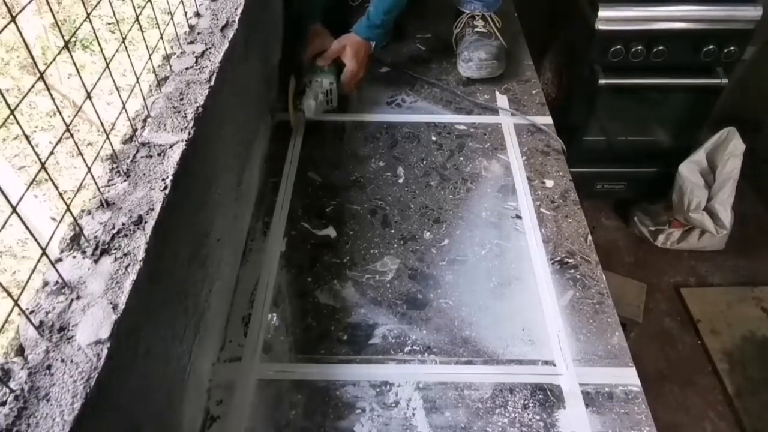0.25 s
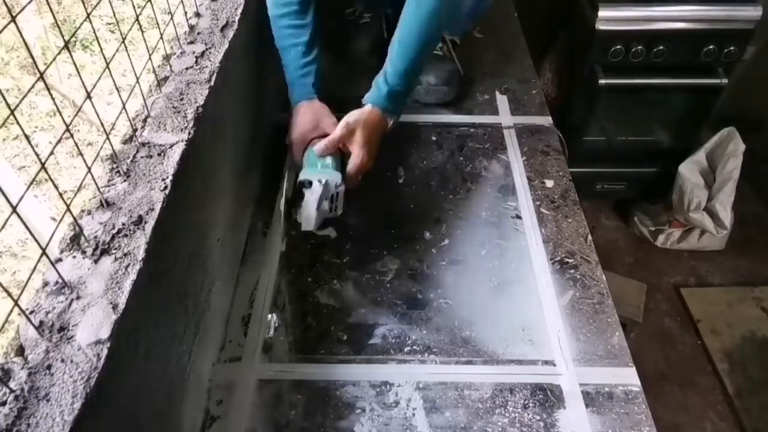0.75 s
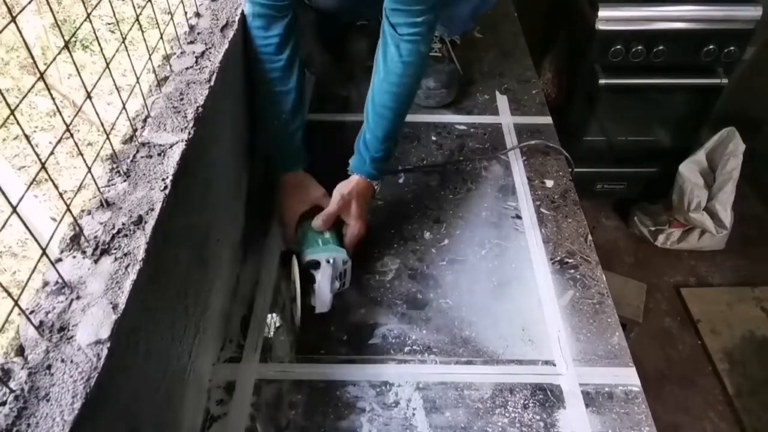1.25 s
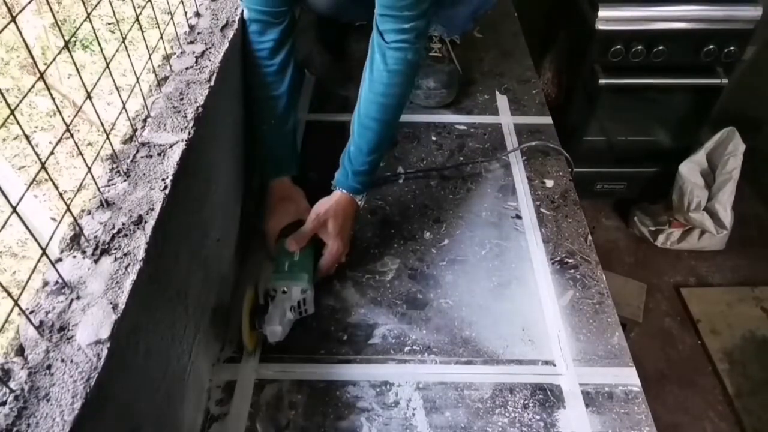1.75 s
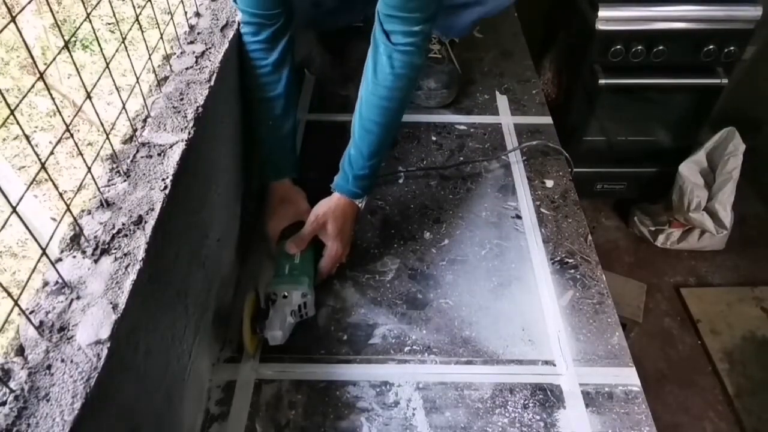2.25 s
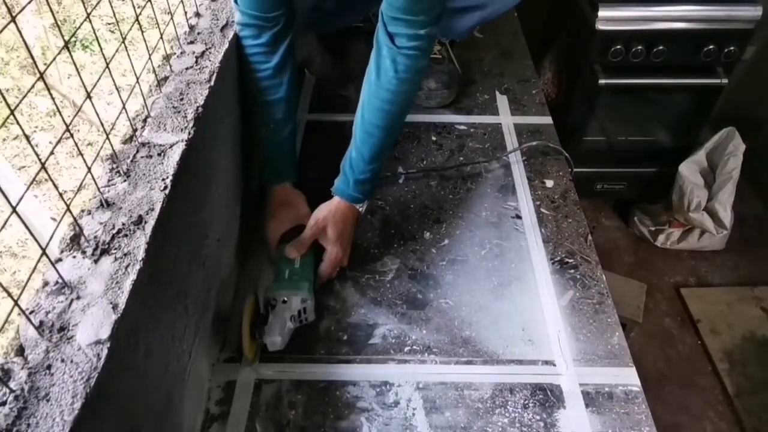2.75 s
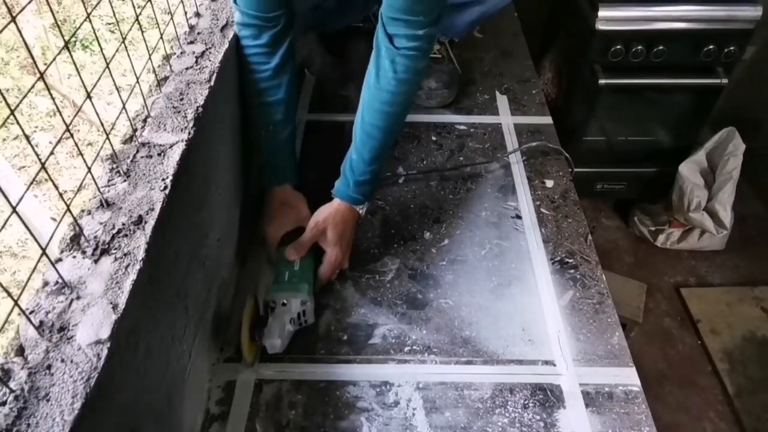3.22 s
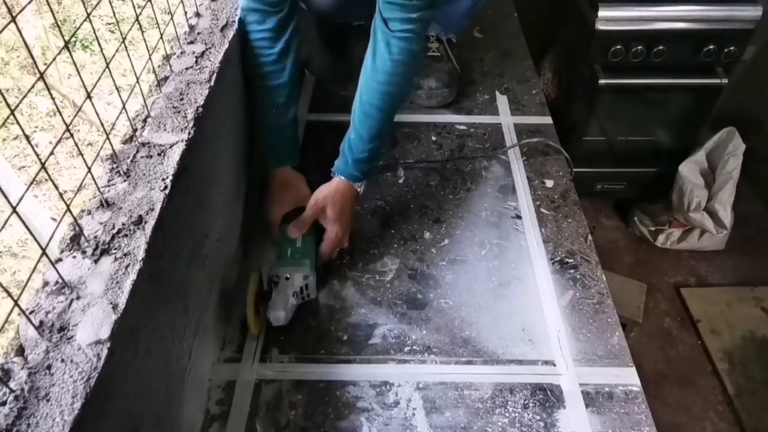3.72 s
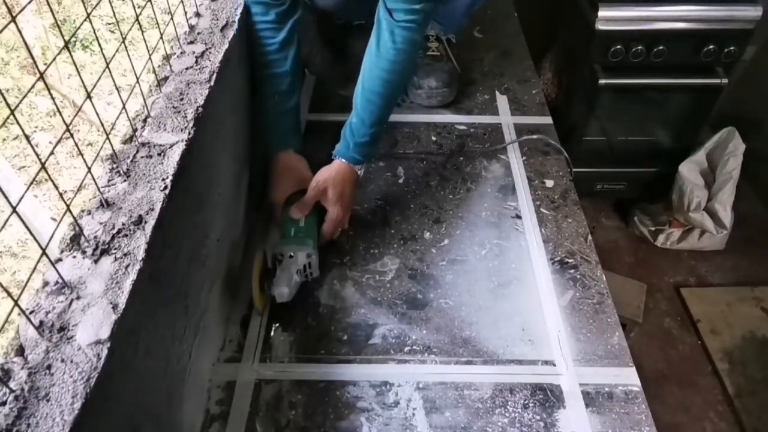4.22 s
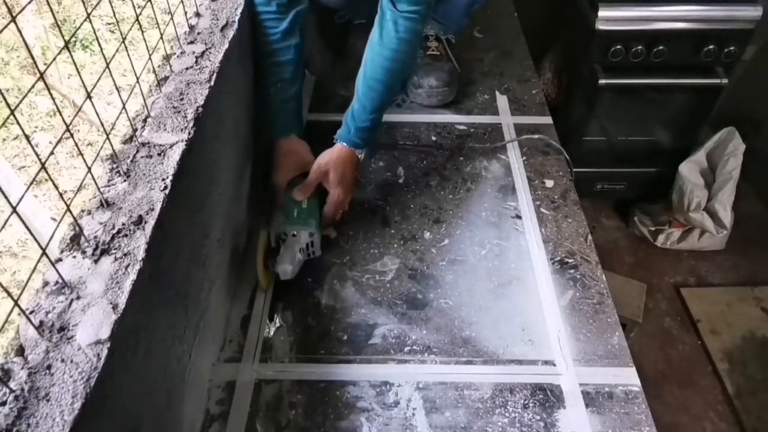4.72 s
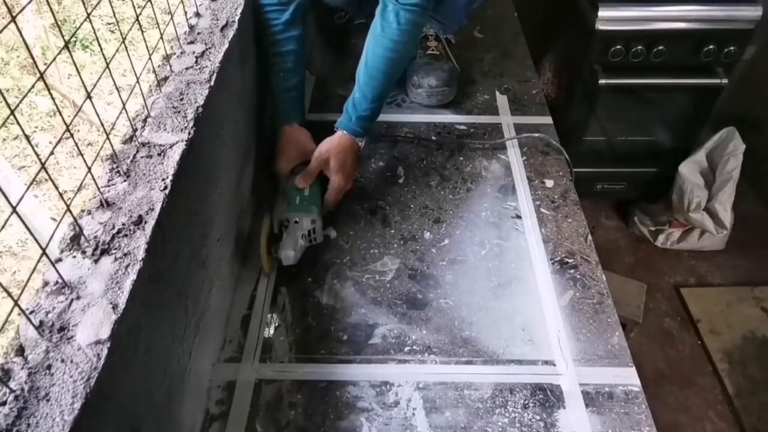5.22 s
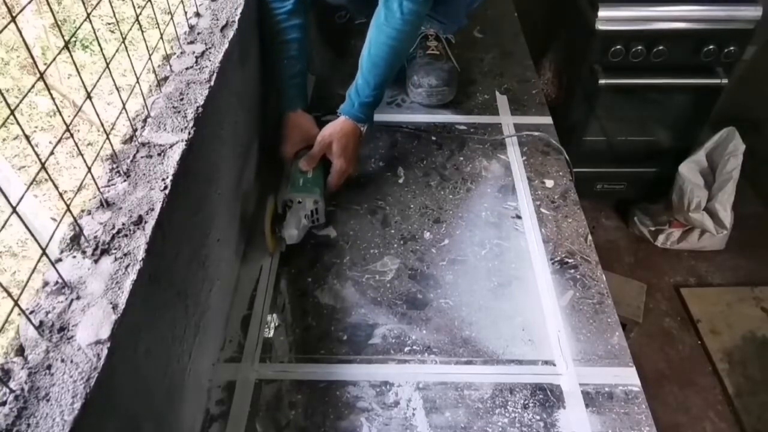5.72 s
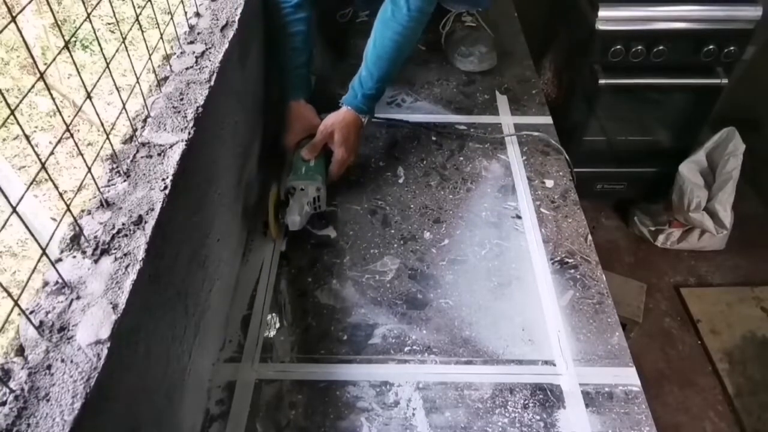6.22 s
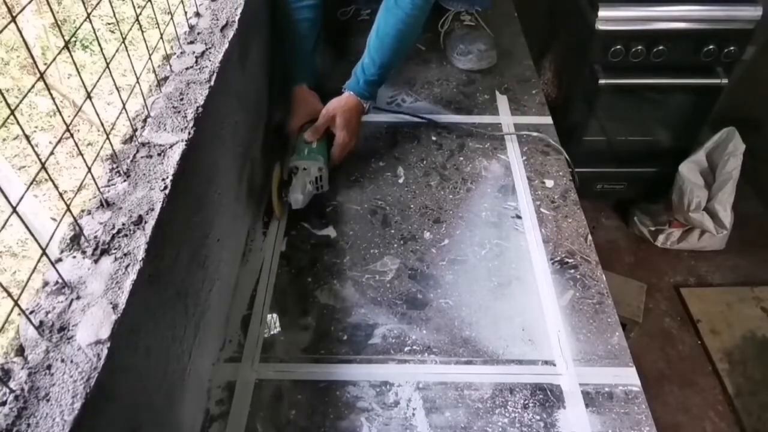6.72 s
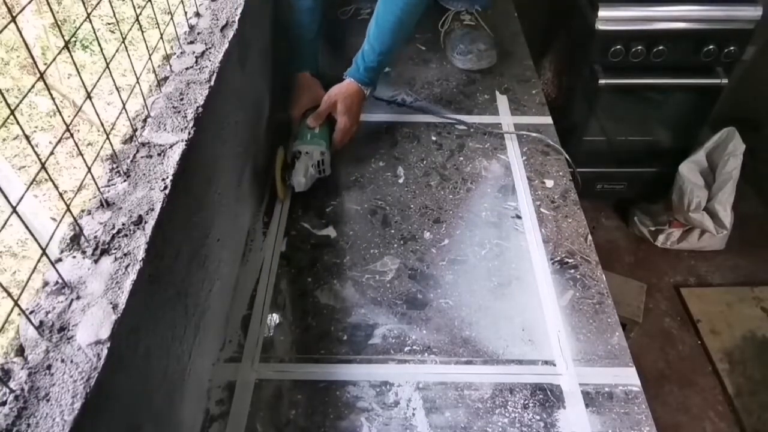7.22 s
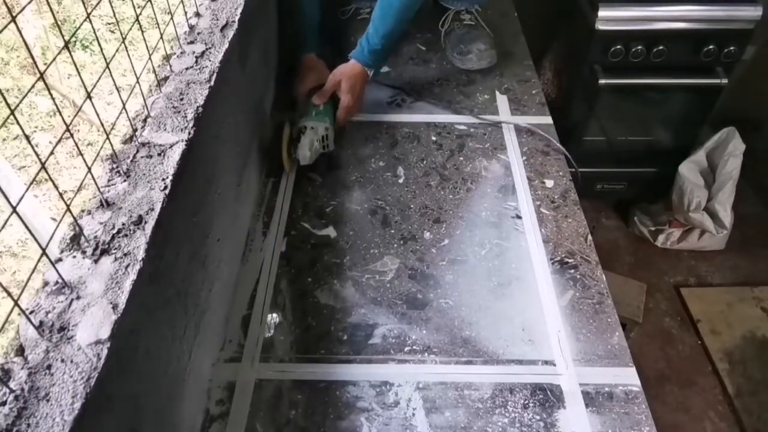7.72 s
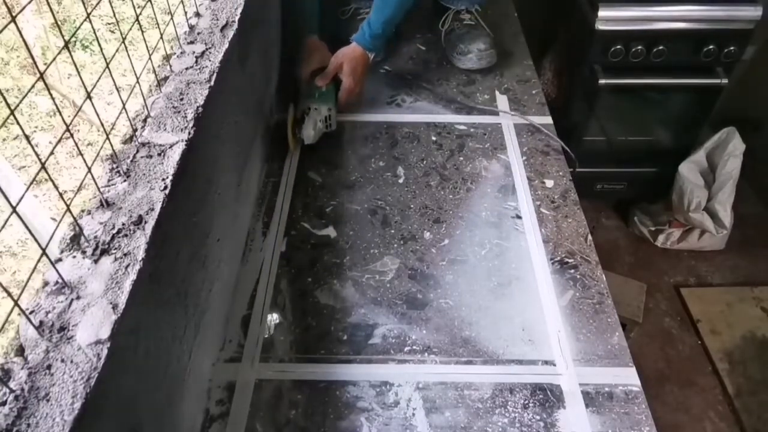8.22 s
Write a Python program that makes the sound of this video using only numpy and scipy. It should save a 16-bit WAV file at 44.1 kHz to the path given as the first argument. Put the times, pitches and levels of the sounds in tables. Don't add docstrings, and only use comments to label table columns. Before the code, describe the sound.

Bright ringing scrape of a grinding disc in tile, a short airy free-running whir, then long gritty cutting close by with flying chips ticking.

```python
import sys
import numpy as np
from scipy import signal
from scipy.fft import rfft, irfft, next_fast_len
from scipy.io import wavfile

SR = 44100
rng = np.random.default_rng(int(sys.argv[2]) if len(sys.argv) > 2 else 0)


def amplitude_ratio(level_db):
    exponent = np.asarray(level_db, float) / 20
    return 10 ** exponent


def unload_audio(sound):
    columns = np.transpose(np.atleast_2d(sound))
    steps = np.round(np.clip(columns, -1, 1) * 32767)
    wavfile.write(sys.argv[1], SR, steps.astype(np.int16))


N = 373086
TIME = np.arange(N) / SR
HZ = np.maximum(np.fft.rfftfreq(next_fast_len(N), 1 / SR), 1)
LIFT_S, DOWN_S = 0.316, 1.85
HALVES = np.array([[.5], [-.5]])


def rms_one(x):
    return x / np.sqrt(np.mean(x ** 2) + 1e-20)


def in_time(rows):
    s, *columns = np.transpose(rows)
    return [np.interp(TIME, s, c) for c in columns]


def during(start_s, end_s, fade_s):
    return np.clip(np.minimum(TIME - start_s + fade_s, end_s + fade_s - TIME) / fade_s, 0, 1)


def at_hz(points):
    hz, value = np.transpose(points)
    return np.interp(np.log(HZ), np.log(hz), value)


def colour(x, gain):
    size = next_fast_len(N)
    return irfft(rfft(x, size) * gain, size)[..., :N]


def drift(rate):
    hop = 40
    r = np.exp(-2 * np.pi * rate * hop / SR)
    noise = rng.standard_normal(N // hop + 2002)
    slow = signal.lfilter([1], [1, -2 * r, r * r], noise)[2000:]
    return np.interp(np.arange(N) / hop, np.arange(len(slow)), rms_one(slow))


def swells(rows):
    t = np.arange(0, N + 64, 64) / SR
    power = sum(amplitude_ratio(db) ** 2 * np.exp(-abs((t - s) / half_s) ** 2.3) for s, db, half_s in rows)
    return np.interp(TIME, t, np.sqrt(power))


def resonate(x, hz, width_hz):
    r = np.exp(-np.pi * width_hz / SR)
    return rms_one(signal.lfilter([1, 0, -1], [1, -2 * r * np.cos(2 * np.pi * hz / SR), r * r], x))


def patchy(x, spectrum, patchy_db, rate, count):
    place = np.clip(np.log(HZ / 400) / np.log(30), 0, 1) * (count - 1)
    gain = amplitude_ratio(at_hz(spectrum))
    total = 0
    for k in range(count):
        band = colour(x, gain * np.maximum(1 - abs(place - k), 0))
        total = total + band * amplitude_ratio(patchy_db * drift(rate))
    return rms_one(total)


def pair(alike):
    mid, side = rng.standard_normal((2, N))
    return colour(mid, np.sqrt(1 + alike)) + colour(side, np.sqrt(1 - alike)) * [[1], [-1]]


# t/s, reach (near 0 - far 1)
REACH = [
    (0, 1),
    (1.0, 0.48),
    (1.9, .0),
    (4.5, 0),
    (6.0, 0.78),
    (8.46, 1.0),
]


def reach():
    return np.clip(in_time(REACH)[0], 0, 1)


# t/s, pressure level/dB, bite depth level/dB
HAND = [(0, -2, -3), (.32, -5.5, -11.5), (1.85, -4, -8), (1.95, -1, -6), (2.3, -0.5, -4.5),
        (2.6, 0.5, -0.5), (3.19, 0, -2), (3.24, -5.5, -5), (3.42, 0.5, -3), (3.5, 1.5, -2), (4.1, .5, -1),
        (4.7, -1.5, 0), (6.0, 0.5, 0.5), (7.42, 0.5, -0.5), (7.52, -2, -7), (7.72, 1, -4),
        (8.31, -1.5, 0.5), (8.46, -3.5, -7)]


def hand():
    return in_time(HAND)


# t/s, peak level/dB, half length/s
SHOVES = [(2.05, -43, 0.056), (2.38, -45, .06), (2.56, -39.5, 0.067), (2.9, -40, 0.081), (3.47, -49, .06),
          (3.69, -38.5, .11), (3.87, -38, .07), (4.06, -39, 0.091), (4.21, -37.5, 0.082), (4.38, -39, 0.05),
          (4.51, -36.5, 0.052), (4.64, -38.5, 0.034), (4.8, -42, 0.043), (4.92, -39.5, 0.034),
          (5.04, -37.5, 0.058), (5.2, -38.5, 0.039), (5.37, -45, 0.17), (5.68, -42, 0.053),
          (5.84, -44.5, 0.057), (6.04, -50, 0.089), (6.26, -48, 0.066), (6.43, -42, 0.036),
          (6.58, -42, 0.031), (6.74, -44, 0.065), (7.1, -47.5, 0.21), (7.44, -44.5, 0.037),
          (7.72, -48, 0.05), (7.875, -48, 0.042), (8.08, -50, 0.064), (8.23, -47, .07)]


def shoves():
    return swells(SHOVES)


def disc_mode(force, near_hz, slide_hz, width_hz):
    pole = np.exp((2j * np.pi * near_hz - np.pi * width_hz) / SR)
    ringing = signal.lfilter([1], [1, -pole], force)
    return rms_one((ringing * np.exp(2j * np.pi * np.cumsum(slide_hz) / SR)).real)


DISC_MODES = [(3620, 3665, 63, -11.5, -1.5, -23, -9), (4707, 4725, 55, -8.5, 0.5, -31, -6),
              (6253, 6165, 210, -6, -7.5, -18, -8), (7740, 7655, 145, -2, -15, -3.5, 1.5),
              (7980, 8090, 87, -4, -1, -15, -12), (8680, 8695, 57, -2.5, -8, -0.5, -14),
              (8890, 9070, 150, -2, -30, 0, -18), (9963, 9930, 54, -0.5, 1, -7, -3.5),
              (10420, 10440, 130, -26, -1.5, -0.5, -10), (11720, 11610, 135, -0.5, -1, -4, -1),
              (12400, 12030, 85, -29, -9, -21, -5), (13250, 13710, 180, -9, -6, -6, -1.5),
              (14740, 14200, 300, 7, -6, -25, -21)]


def disc_ring(bite, far, depth_db):
    ring = 0
    force = bite * (rng.standard_normal((3, N)) + 1j * rng.standard_normal((3, N)))
    for near_hz, far_hz, width_hz, *db in DISC_MODES:
        near_db, far_db = np.reshape(db, (2, 2, 1))
        turn = np.exp(1j * rng.normal(0, 1.0) * HALVES)
        beam_db = near_db + (far_db - near_db) * far + 1.56 * np.array([drift(7.2), drift(5.3)])
        if near_hz < 7000:
            beam_db = beam_db - 0.86 * (depth_db + 3.0) * (1 - far)
        slide_hz = (far_hz - near_hz) * far + (10 + 25 * far) * drift(8)
        mode_force = 1.54 * force[0] * turn + force[1:]
        ring = ring + amplitude_ratio(beam_db) * disc_mode(mode_force, near_hz, slide_hz, width_hz)
    return rms_one(ring)


# f/Hz, level/dB per Hz
GRIT = [(450, -29), (800, -7), (2000, -3.5), (3300, 3.5), (5100, 1), (5600, 0.5), (6000, -1), (7000, 2.5),
        (9500, -1), (12200, -2), (16000, -3.5)]


def grit_hiss(bite):
    grit = patchy(bite * pair(0.028), GRIT, 1.5, 3.3, count=10)
    return amplitude_ratio(3.5 * shoves() / amplitude_ratio(-38)) * grit


# f/Hz, width f/Hz, level/dB
HOUSING = [
    (2330, 130, -5),
    (2668, 88, 1),
    (2896, 120, 2.5),
]
# t/s, peak level/dB over the housing
SNAGS = [(.136, -1), (1.86, -5), (3.48, -2), (3.91, 3.5), (5.01, 0), (5.17, -8), (6.08, -1), (6.39, 3),
         (6.97, 4.5), (7.13, 1), (7.46, -6), (7.69, 0), (7.89, -1), (8.07, -4), (8.21, -5), (8.4, 3)]


def housing_shake(bite, far):
    shake = 0
    for hz, width_hz, db in HOUSING:
        shake = shake + amplitude_ratio(db + 1.5 * drift(2.6)) * resonate(bite * pair(0.23), hz, width_hz)
    snag_s = 0.025
    chatter = amplitude_ratio(2.5 * drift(25)) + swells([(s, db, snag_s) for s, db in SNAGS])
    return amplitude_ratio(0.5 * far) * chatter * rms_one(shake)


def cut():
    far, (pressure_db, depth_db) = reach(), hand()
    bite = amplitude_ratio(0.57 * drift(23) + 0.63 * drift(71))
    ring = amplitude_ratio(-30.5 + pressure_db) * disc_ring(bite, far, depth_db)
    grit = amplitude_ratio(-33 + depth_db) * grit_hiss(bite)
    housing = amplitude_ratio(-43) * housing_shake(bite, far)
    touching = 1 - during(LIFT_S + .02, DOWN_S - .02, .02)
    return touching * (ring + grit + housing)


# f/Hz, level/dB per Hz
FAN = [(30, -29), (150, -25), (300, -25), (470, -32), (560, -12), (1000, -6.5), (1600, -10), (2650, -5),
       (4700, -2.5), (5600, -8), (7300, -11.5), (8000, -11.5), (12000, -14), (13000, -14), (14500, -12),
       (15500, -8)]
# f/Hz, left-right likeness of the fan rush
FAN_LIKENESS = [(60, 0.22), (130, 0.94), (290, 0.98), (640, 0.71), (1410, 0.53), (3100, -0.025),
                (6820, -0.15), (15000, 0.17)]
# f/Hz, width f/Hz, level/dB at lift-off, level/dB when set down again
FAN_DUCT = [(615, 300, -21.5, -20), (932, 86, -37, -9.5), (1143, 360, -15.5, -13.5),
            (1820, 350, -18, -24.5), (2600, 560, -6, -12.5), (6890, 110, -18, -19), (7310, 74, -28, -7.5),
            (7660, 100, -34, -30)]
# f/Hz, level/dB
LOADED_LOWS = [
    (700, -3.5),
    (1200, 0),
]


def motor():
    air = pair(np.clip(at_hz(FAN_LIKENESS), -1, 1)) * amplitude_ratio(1.07 * drift(64))
    turned = in_time([(.6, 0.085), (1.1, 0.47), (1.8, 0.86), (1.95, 0.3)])[0]
    free = during(LIFT_S + 0.043, DOWN_S - .01, 0.05)
    rush = patchy(air, FAN, 0.97, 20, count=6)
    for hz, width_hz, lift_db, down_db in FAN_DUCT:
        duct_db = lift_db + (down_db - lift_db) * turned + 2.0 * drift(1.64)
        duct_db = duct_db - (1 - free)
        rush = rush + amplitude_ratio(duct_db) * resonate(air, hz, width_hz)
    carry = np.sin(np.pi * np.clip((TIME - LIFT_S) / (DOWN_S - LIFT_S), 0, 1))
    free_db = -31 + 1.4 * carry - 0.06 * drift(9.5)
    load_db = -37.5 - 0.14 * hand()[1]
    loaded = amplitude_ratio(load_db) * colour(rush, amplitude_ratio(at_hz(LOADED_LOWS)))
    return (1 - free) * loaded + free * amplitude_ratio(free_db) * rush


# f/Hz, level/dB per Hz
PATTER = [(15, -7), (60, -5), (200, -1), (800, -4.5), (2000, -6.5), (5000, -12.5), (16000, -5)]


def small_chips():
    stray_db = -54 + 1.2 * hand()[1]
    stray = (1 - during(LIFT_S, DOWN_S, .02)) * amplitude_ratio(stray_db)
    dust = amplitude_ratio(-66)
    level = shoves() + stray + dust
    pan_db = 7 + (5 - 7) * reach() + 1 * drift(5)
    shower = amplitude_ratio(1.74 * drift(11.4) + 2.36 * np.array([drift(37.3), drift(22)]))
    hit = rng.random((2, N)) < 3500 / SR
    size = amplitude_ratio(3.64 * np.minimum(rng.exponential(1, (2, N)), 4.0))
    inward = np.where(rng.random((2, N)) < .68, 1, -1)
    patter = rms_one(colour(shower * hit * size * inward, amplitude_ratio(at_hz(PATTER)) * (HZ > 5)))
    return patter * level * amplitude_ratio(10 + pan_db * HALVES)


# t/s, peak level/dB, port (left 0, right 1)
BIG_CHIPS = [
    (2.337, -45, 0),
    (2.485, -30, 0),
    (3.86, -23, 1),
    (4.11, -18, 0),
    (4.201, -22, 0),
    (5.687, -19.5, 0),
    (6.408, -39, 0),
]


def big_chips():
    hits = np.zeros((2, N))
    for s, db, port in BIG_CHIPS:
        hits[round(port), round(s * SR)] = amplitude_ratio(db)
    push = np.hanning(round(0.0024 * SR))
    return signal.lfilter([1, -1], [1, -.992], signal.lfilter(push, [1], hits))


# f/Hz, level/dB per Hz
RUMBLE = [(20, 2), (60, 3), (150, -4), (300, -14), (500, -32)]


def room():
    noise = rng.standard_normal((2, N))
    return amplitude_ratio(-64) * rms_one(colour(noise, amplitude_ratio(at_hz(RUMBLE)) * (HZ > 12)))


def scene():
    return cut() + motor() + small_chips() + big_chips() + room()


def roll_off(x):
    return signal.sosfilt(signal.butter(12, 15790, fs=SR, output="sos"), x)


# f/Hz, level/dB
RIGHT_TOP = [
    (14300, 0),
    (14900, -10),
]
TREBLE_HZ = [5000, 5600, 6100, 12250, 12500, 12950, 13200, 13700, 14500, 15000, 15700]
TREBLE_DB = [
    [0, -2, 0, 0, -11, -17, -9, -3.5, -10, -27, -1.5],
    [0, -3.5, 0, 0, 2, -8, 6.5, -13, -5, -22, -15],
]


def record(dry):
    far = reach()
    dry = np.array([dry[0], colour(dry[1], amplitude_ratio(at_hz(RIGHT_TOP)))])
    near_sound, far_sound = (colour(dry, amplitude_ratio(at_hz(np.c_[TREBLE_HZ, db]))) for db in TREBLE_DB)
    at_ports = (1 - far) * near_sound + far * far_sound
    heard = .26 * np.tanh(at_ports / .26)
    ripple = np.cos(2 * np.pi * (np.arange(N) - 188) / 256)
    return roll_off(heard * amplitude_ratio(0.8 * ripple))


dry = scene()
out = record(dry)
unload_audio(out)
```